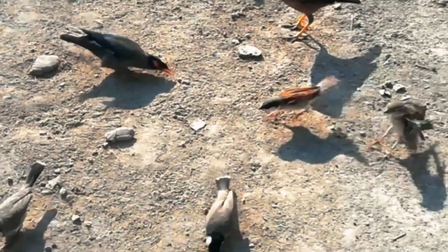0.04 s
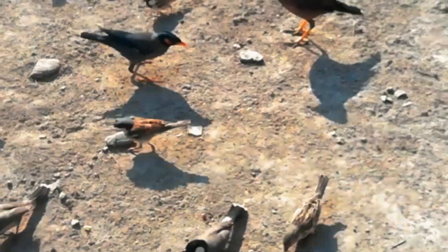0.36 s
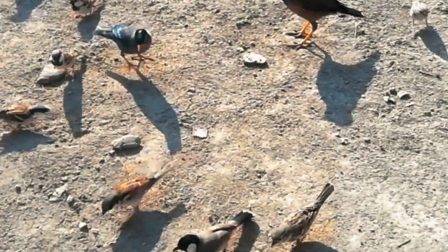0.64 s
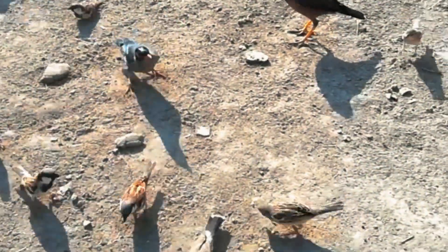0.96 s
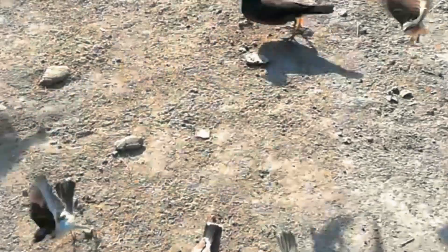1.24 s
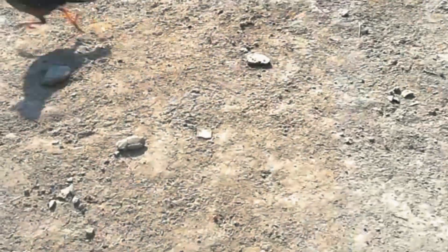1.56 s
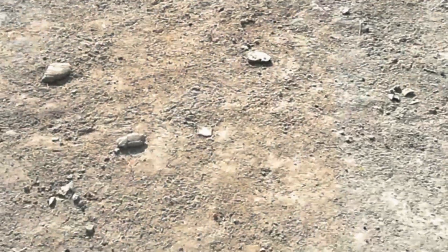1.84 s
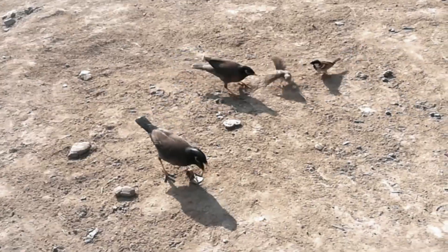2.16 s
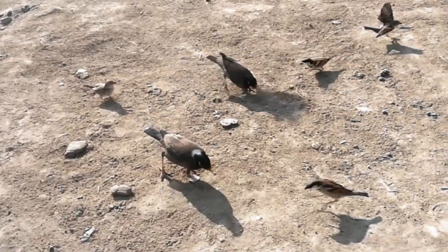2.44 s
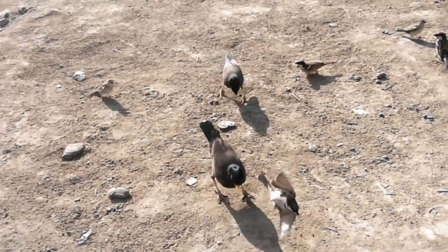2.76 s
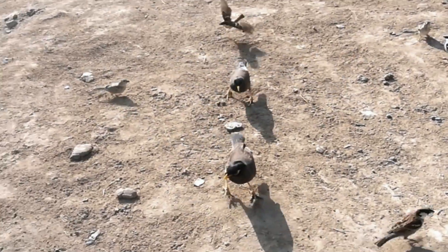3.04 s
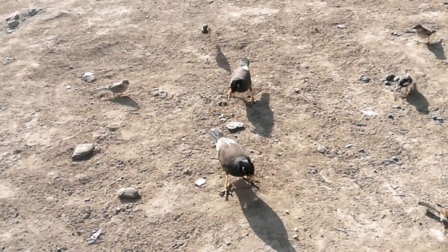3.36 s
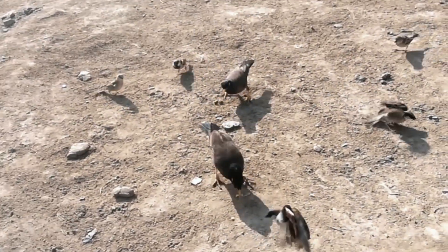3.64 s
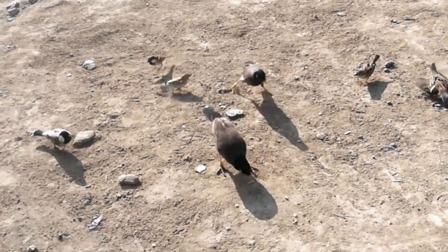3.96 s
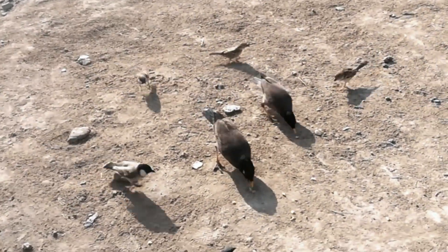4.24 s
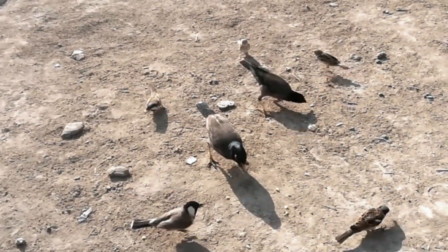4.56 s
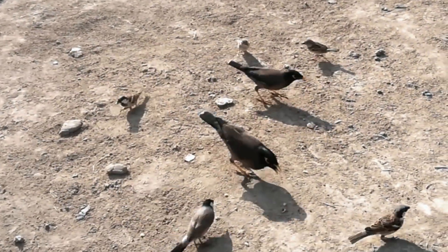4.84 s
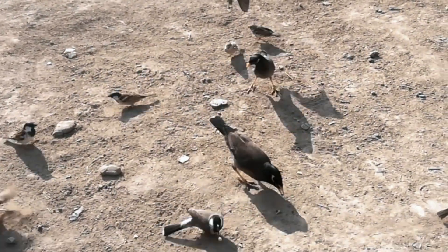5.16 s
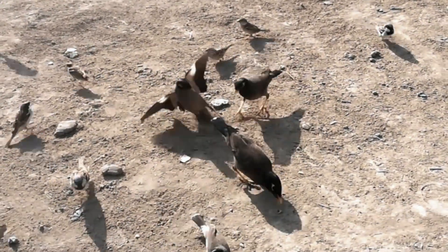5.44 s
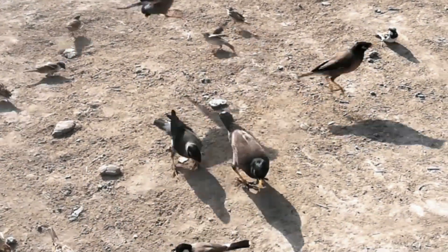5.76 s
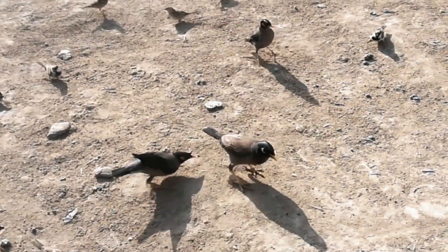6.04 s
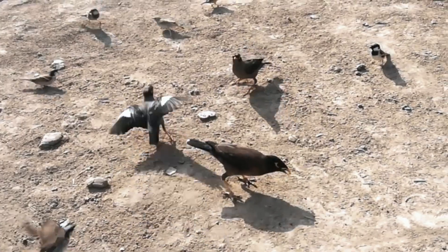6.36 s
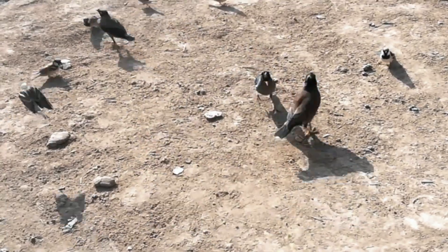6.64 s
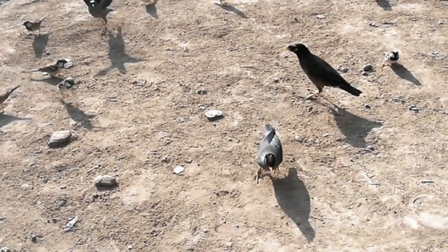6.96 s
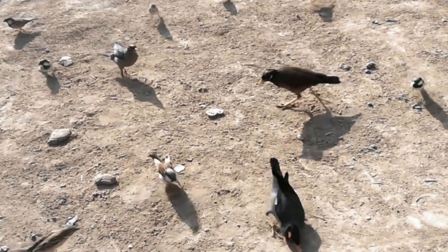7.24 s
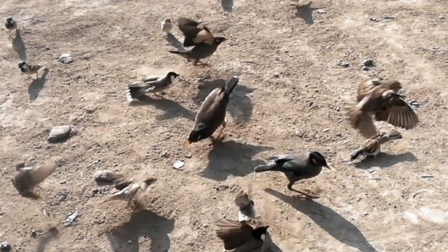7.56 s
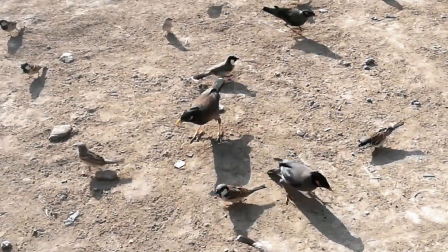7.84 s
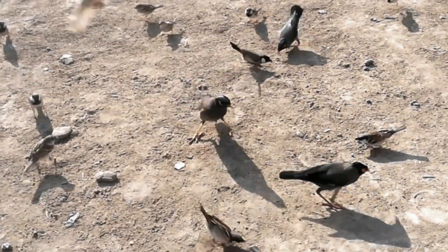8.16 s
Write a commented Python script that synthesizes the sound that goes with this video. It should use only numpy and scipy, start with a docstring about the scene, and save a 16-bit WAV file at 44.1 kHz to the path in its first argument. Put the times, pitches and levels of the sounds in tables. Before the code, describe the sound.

Sharp bird chirps, thin whistles and a repeated two-note call over distant flock chatter, with a flurry of wings near the start.

```python
"""A yard of bare, dry ground where sparrows and mynas feed. Over a bed of rumble and hiss, a far flock
chatters, neighbours cheep, and beaks and feet tap the dirt. Early on the flock takes off in a whoosh
of wing strokes; the sound cuts out for a moment and fades back in. Up front are thin whistles, rasps
and a sharp two-note call. Each voice is a syrinx tone on a gliding pitch, harsh when that pitch shakes."""
import sys
import numpy as np
from scipy import signal
from scipy.fft import rfft, irfft, next_fast_len
from scipy.io import wavfile
from scipy.ndimage import uniform_filter1d, minimum_filter1d, map_coordinates

SR = 44100
rng = np.random.default_rng(int(sys.argv[2]) if len(sys.argv) > 2 else 0)


def to_wav(sig):
    """Store sig (one row per channel, or 1-D mono) as 16-bit WAV at the path in sys.argv[1].

    Samples outside -1..1 are clipped; the rate is SR.
    """
    pcm = np.clip(np.atleast_2d(sig), -1, 1) * 32767
    pcm = np.round(pcm).astype(np.int16)
    wavfile.write(sys.argv[1], SR, pcm.T)  # frames by channels


N = 361179

# Tone colours (frequency [Hz], gain [dB])
RUMBLE_EQ = [(20, -1.5), (40, -2.5), (60, 7), (85, -5), (115, -0.5), (148, 1.5), (200, -5), (300, -9.5),
             (500, -14), (900, -17), (1500, -21.5), (4000, -40)]
HISS_EQ = [(700, -13.5), (2000, 6.5), (3100, 8), (4200, 4.5), (7000, -0.5), (11000, -2), (15500, -2)]
DOWNWASH_EQ = [(25, -3.5), (60, 1), (130, 0.5), (300, -7.5), (750, -14), (2200, -25), (5000, -37)]  # air pushed by wings
FEATHER_EQ = [(150, -36), (400, 7), (1200, 1.5), (3000, 2.5), (7000, -4), (15500, -11)]
DIRT_EQ = [(100, -24), (450, 5), (1400, -3.5), (2600, -2.5), (5000, -15), (16000, -48)]  # a tap on packed earth
SAND_EQ = [(500, -28), (2500, -28), (6000, -3.5), (15000, -17.5)]  # scraped sand
THROAT_EQ = [(1200, -3), (2400, 2), (3600, 3.5), (5500, 1), (7500, -11.5), (11000, -22.5)]  # throat and beak of a small bird
FLAP_EQ = [(400, -26), (1500, -9), (2600, 0), (5000, -1), (8000, -7), (15000, -23)]  # a myna's wing
# Stereo image of the noise layers (frequency [Hz], left-right correlation [0-1])
NOISE_CORRELATION = [(130, 0.917), (290, 0.74), (640, 0.32), (1500, 0.011)]
# Stereo tilt of the calls (frequency [Hz], left over right [dB])
CALL_TILT = [(1200, 0), (2700, 6.5), (3500, 3), (4500, -1.5), (6000, -2), (12000, -12.5)]
# Decay of the yard's echo (frequency [Hz], time to fall 60 dB [s])
YARD_DECAY = [(300, 1), (3000, 0.21), (6000, 0.2), (14000, 0.046)]

# Fader rides (time [s], level [dB])
RUMBLE_RIDE = [(0, -42), (1.9, -47), (2.0, -52), (3.6, -52.5), (7.0, -52.5), (8.15, -51)]
HISS_RIDE = [(0, -50), (1.9, -51), (2.0, -57.5), (8.15, -58)]
CHATTER_RIDE = [(2.7, -54), (2.94, -54), (3.32, -44), (3.64, -42.5), (4.25, -55.5), (4.43, -45.5),
                (4.61, -59), (5.87, -60), (6.25, -52.5), (7.21, -59), (7.36, -50), (8.15, -50.5)]
MASTER_RIDE = [(1.914, -6), (1.92, -45), (1.955, -24.5), (2.02, -8.5), (2.12, 2), (2.2, 3.5)]  # cuts out, then fades back in
# Swell of the take-off (time [s], downwash fader [dB], feather fader [dB])
TAKEOFF_RIDE = [(0.7, -47.5, -50.5), (1.208, -31, -38.5), (1.92, -45.5, -55)]

# Single birds flying a short way (time [s], length [s], level [dB])
FLIT_CUES = [(3.58, 0.17, -55.5), (5.318, 0.28, -59.5), (6.318, 0.323, -58), (7.306, .3, -54.5)]
# A myna's wing strokes (time [s], level [dB])
FLAP_CUES = [(6.392, -47), (6.468, -46), (6.534, -43.5)]
# Beaks and feet on the dirt (time [s], level [dB], sand against tap [dB])
PECK_CUES = [(2.544, -40, -23), (2.744, -41, -23), (3.013, -39, -21), (3.242, -38, -41.5),
             (4.703, -39, -33.5), (4.964, -43, -10), (5.363, -42, -12), (5.58, -42.5, -10),
             (6.294, -44, -22), (6.445, -45, -19)]
# Hoarse falling chirps, from sparrows and, at 0.935 s, a myna (time [s], mid-note pitch [Hz], level [dB])
CHIRP_CUES = [(.935, 2720, -33.5), (3.391, 2690, -46.5), (3.584, 2820, -45.5), (3.629, 2350, -45.5),
              (3.772, 2836, -43), (4.132, 3090, -50), (4.213, 2547, -47), (4.326, 2690, -43),
              (4.55, 2005, -45.5), (5.869, 3020, -56), (6.087, 3350, -43), (6.71, 3030, -47)]
# Cheeps that climb or sink, then level off
# (time [s], length [s], end pitch [Hz], climb [octaves], level [dB], harshness [0-1])
CHEEP_CUES = [(0.116, 0.051, 1886, -0.19, -42, 0.22), (.194, 0.078, 1705, -0.59, -42, 0.5),
              (0.297, .048, 2940, 0.547, -32.5, 0.7), (0.425, 0.036, 3530, .6, -43.5, 1),
              (0.854, 0.1, 2148, -.15, -38.5, 0.6), (1.277, 0.074, 4410, 0.39, -32.5, .96),
              (1.279, .067, 2220, .1, -36, 1), (1.599, 0.086, 3940, 0.37, -38, 1),
              (1.676, 0.0937, 4000, 0, -46, 0.67), (1.82, 0.089, 3860, -0.29, -51.5, 0.57),
              (3.531, 0.046, 3520, -0.0036, -43, 0.77), (3.695, 0.072, 4780, 0.04, -49.5, 0.85),
              (3.872, 0.1, 4380, .3, -48.5, 0.84), (4.383, .04, 4220, 0.48, -47.5, 0.92),
              (4.898, 0.049, 6540, 0.071, -50, .9), (4.981, 0.036, 2710, 0.57, -43, .2),
              (5.031, 0.038, 2750, .15, -53, .2), (5.212, 0.042, 2560, 0.15, -52, 0.1),
              (5.34, 0.032, 2274, 0, -51.5, 0.3), (6.087, 0.018, 7700, 0.44, -55.5, .3),
              (6.186, 0.073, 3426, 0.8, -44.5, .77), (6.585, .044, 2655, 0.15, -46, 0.63),
              (6.846, 0.074, 4100, -0.1, -44, 1), (7.664, 0.0434, 3610, 1.03, -37, 0.5),
              (7.679, 0.0448, 2772, 0.67, -36, 0.44)]
# Long whistles (time [s], length [s], snap depth [Hz], sink time [s], end pitch [Hz], level [dB],
# swell [dB], lowest pitch of the flick [Hz])
WHISTLE_CUES = [(0.801, .185, 2476, 0.1, 4054, -17.5, -2, 6470),
                (2.149, 0.14, 919, 0.0664, 4195, -20.5, 0.5, 5950)]
# Thin notes sliding down (time [s], length [s], end pitch [Hz], level [dB])
SLIDE_CUES = [(.232, 0.026, 5100, -37), (.271, 0.024, 3507, -18.5), (0.36, 0.046, 4550, -42.5),
              (4.923, 0.058, 2546, -40), (7.608, 0.033, 4710, -41)]
# Harsh scolds (time [s], length [s], centre pitch [Hz], level [dB])
SCOLD_CUES = [(0.25, 0.026, 3065, -26), (2.394, 0.019, 3190, -39.5), (4.463, .015, 3320, -38),
              (4.825, 0.038, 2703, -37.5), (7.176, 0.026, 2740, -33.5), (7.245, 0.021, 3054, -31)]
# Two-note calls (time [s], lead end pitch [Hz], main end pitch [Hz], lead level [dB], burr level [dB],
# main level [dB], main sag [dB], overtone trim [dB], left over right [dB], left lag [s])
TWO_NOTE_CUES = [(2.099, 3390, 2630, -33, -35, -26, 1, -15, 2, 0.00021),
                 (2.403, 3680, 2740, -21.5, -32, -16, 3, -28, 4.5, 0.00016),
                 (3.448, 3470, 2460, -17, -28.5, -15.5, 12.5, -24.5, 3.5, 0.000336),
                 (3.906, 3380, 2422, -14, -34.5, -10, 20, -28.5, 2, .00022),
                 (4.475, 3376, 2470, -13, -32.5, -13, 14.5, -26.5, 4, 0.000318),
                 (4.830, 2980, 2534, -36, -38, -32.5, 1.5, -30.5, 2, 0.000357),
                 (6.883, 3310, 2653, -36.5, -38.5, -26, 2, -7, 4, 0.000036)]


def amp(db):
    """Decibels to gain."""
    return 10 ** (np.asarray(db) / 20)


def unit(x):
    """Scale to rms 1."""
    return x / np.sqrt(np.mean(x ** 2) + 1e-20)


def along(points, hz):
    """Read (frequency [Hz], value) points on a log axis."""
    freqs, values = np.transpose(points)
    return np.interp(np.log(hz + 1), np.log(freqs + 1), values)


def clock(length):
    """Sample times over a length in seconds."""
    return np.arange(int(length * SR)) / SR


def curves(rows):
    """One automation curve for each column after the time."""
    times, *columns = np.transpose(rows)
    return [np.interp(np.arange(N) / SR, times, column) for column in columns]


def wobble(t, rate):
    """A smooth random modulator with rate knots a second."""
    return map_coordinates(rng.standard_normal(size=1024), [t * rate], mode="mirror")


def filtered(x, response):
    """Run x through a frequency response."""
    n = x.shape[-1]
    size = next_fast_len(n + 2048)
    return irfft(rfft(x, size) * response(np.fft.rfftfreq(size, 1 / SR)), size)[..., :n]


def coloured(x, eq):
    """x through an EQ curve, at rms 1."""
    return unit(filtered(x, lambda hz: amp(along(eq, hz))))


def rush(eq):
    """Stereo noise, narrow in the bass and wide in the treble."""
    def width(hz):
        angle = np.arccos(np.clip(along(NOISE_CORRELATION, hz), -1, 1)) / 2
        return np.array([np.cos(angle), np.sin(angle)])
    mid, side = filtered(rng.standard_normal((2, N)), width)
    return coloured(np.array([mid + side, mid - side]), eq)


def add(out, start, x):
    """Mix x into out from start, in seconds."""
    part = out[:, max(round(start * SR), 0):][:, :x.shape[-1]]
    part += x[..., :part.shape[1]]


def gate(t, rise, fall):
    """A smooth fade in and out."""
    fade_in = np.sin(np.pi / 2 * np.clip(t / rise, 0, 1))
    fade_out = np.sin(np.pi / 2 * np.clip((t[-1] - t) / fall, 0, 1))
    return (fade_in * fade_out) ** 2


def placed(x, pan_db, lag, bounce):
    """A call arrives left and right directly and by short bounces off the ground and things near by."""
    delays, sides = rng.uniform(0.000587, 0.009, (2, 4, 1)), np.array([[1], [-1]])
    direct = lambda hz: np.exp(-1j * np.pi * hz * lag * sides)
    bounces = lambda hz: bounce * np.exp(-2j * np.pi * hz * delays).mean(axis=1)
    balance = lambda hz: amp(sides * (pan_db + along(CALL_TILT, hz)) / 2)
    return filtered(np.pad(x, (0, 512)), lambda hz: balance(hz) * (direct(hz) + bounces(hz)))


def syrinx(hz, overtone_db, step_db):
    """A bird's voice: a sine on a moving pitch plus four overtones, losing step_db from one to the next."""
    phase = 2 * np.pi * np.cumsum(hz) / SR
    overtones = sum(amp(overtone_db - step_db * (k - 2)) * np.sin(k * phase) * (k * hz < SR / 2)
                    for k in range(2, 6))
    return np.sqrt(2) * (np.sin(phase) + overtones)


def outdoor_bed():
    """Far rumble and soft hiss drift together; one faint distant tone swells and stops."""
    out = np.zeros((2, N))
    drift = amp(0.7 * wobble(np.arange(N) / SR, 8))
    for ride, eq in (RUMBLE_RIDE, RUMBLE_EQ), (HISS_RIDE, HISS_EQ):
        out += amp(curves(ride)[0]) * drift * rush(eq)
    t = clock(0.5)
    tone = syrinx(474 * (1 + 0.005 * wobble(t, 28)), overtone_db=-16, step_db=-1)
    add(out, 6.27, amp(-60) * tone * gate(t, rise=0.41, fall=0.14))
    return out


def yard_echo(send):
    """The ground and far walls scatter a thin echo whose top end dies first."""
    hz, t, noise = signal.stft(rng.standard_normal((2, SR // 2)), SR, nperseg=256)
    decay = amp(-60 * t / along(YARD_DECAY, hz)[:, None])
    tail = signal.istft(noise * decay, SR, nperseg=256)[1]
    predelayed = np.pad(send, ((0, 0), (300, 0)))
    return signal.fftconvolve(predelayed, tail / np.linalg.norm(tail[0]), axes=1)[:, :N]


def falling(length, hz, octaves):
    """A pitch that droops ever faster, passing hz halfway."""
    return hz * 2 ** (-octaves * ((clock(length) / length) ** 2 - 0.5 ** 2))


def climbing(length, hz, octaves):
    """A pitch that climbs quickly and levels off at hz."""
    return hz * 2 ** (-octaves * (1 - clock(length) / length) ** 3.1)


def cheep(pitch_hz, harsh):
    """Pushed harder, a note shakes, its overtones grow and the second side of the syrinx joins in."""
    t = np.arange(len(pitch_hz)) / SR
    shaken = lambda: pitch_hz * (1 + (0.01 + 0.062 * harsh ** 2) * wobble(t, 850))
    first = syrinx(shaken(), overtone_db=-31 + 28.9 * harsh, step_db=5)
    second = syrinx(shaken() * rng.uniform(1.15, 1.4), overtone_db=-8 + 6.9 * harsh, step_db=-4)
    voice = first + 0.51 * harsh * second
    flutter = amp((1.5 + 1.9 * harsh) * wobble(t, 350))
    return coloured(voice * flutter * gate(t, rise=0.01, fall=0.0077), THROAT_EQ)


def far_flock(count=240):
    """Far sparrows chatter nonstop; the busier the flock, the louder and hoarser each bird."""
    out = np.zeros((2, N))
    times, chatter_db = np.transpose(CHATTER_RIDE)
    starts = (np.arange(count) + rng.random(count)) / count * N / SR
    for start, (pitch, slope, size, side, strain) in zip(starts, rng.standard_normal((count, 5))):
        db = np.interp(start, times, chatter_db)
        harsh = np.clip(0.56 + 0.42 * strain + 0.056 * (db - np.median(chatter_db)), 0.55, 1)
        contour = falling(length=0.06, hz=3116 * np.exp(0.13 * pitch), octaves=0.053 + 0.196 * slope)
        note = amp(db - 10.5 + 3.5 * size) * cheep(contour, harsh)
        add(out, start, placed(note, pan_db=2.8 * side + 1, lag=0.00015 * side, bounce=0.79))
    return out


def neighbours():
    """Birds round about fill the middle distance with hoarse chirps and cheeps."""
    out = np.zeros((2, N))
    notes = [(start, db, cheep(falling(length=0.067, hz=hz, octaves=0.32), harsh=0.9))
             for start, hz, db in CHIRP_CUES]
    notes += [(start, db, cheep(climbing(length, hz, climb), harsh))
              for start, length, hz, climb, db, harsh in CHEEP_CUES]
    for start, db, note in notes:
        add(out, start, placed(amp(db) * note, pan_db=-2.5, lag=rng.uniform(0, 0.00021), bounce=0.89))
    return out


def pecks(faint_count=42):
    """Dull taps on packed dirt, each with a scrape of sand; many fainter ones fall at random."""
    out, t = np.zeros((2, N)), clock(0.039)
    faint = [(3.1 + 6 * when, -52 + 8 * force, -10) for when, force in rng.random((faint_count, 2))]
    for start, db, sand_db in PECK_CUES + faint:
        tap = coloured(rng.standard_normal(len(t)), DIRT_EQ) * amp(-60 * t / 0.045)
        sand = coloured(rng.standard_normal((2, len(t))), SAND_EQ) * amp(sand_db - 60 * t / 0.038)
        add(out, start, amp(db - 3.5) * (tap + sand) * gate(t, rise=0.00029, fall=0.009))
    return out


def myna_flaps():
    """A myna hops aside with a few crisp wing strokes."""
    out, t = np.zeros((2, N)), clock(0.016)
    for start, db in FLAP_CUES:
        stroke = coloured(rng.standard_normal((2, len(t))), FLAP_EQ)
        add(out, start, amp(db) * stroke * gate(t, rise=0.0075, fall=0.006))
    return out


def wingbeats(t, rate, birds):
    """The envelope of birds flapping out of step: each stroke is a short swell of its own strength."""
    pace = lambda: rate * np.exp(0.3 * rng.standard_normal() + 0.1906 * wobble(t, 8.3))
    cycles = [np.cumsum(pace()) / SR + rng.random() for _ in range(birds)]
    return unit(sum(np.exp(5 * np.cos(2 * np.pi * cycle) + wobble(t, 21)) for cycle in cycles))


def wings():
    """Each stroke puffs air and swishes feathers: first the whole flock, later single birds."""
    flits, t = np.zeros((2, N)), np.arange(N) / SR
    wash_db, feather_db = curves(TAKEOFF_RIDE)
    airborne = np.interp(t, [0.7, 0.9, 1.92, 1.95], [0, 1, 1, 0])
    strokes = wingbeats(t, rate=16, birds=11)
    feathers, air = rush(FEATHER_EQ), rush(DOWNWASH_EQ)
    wash = amp(wash_db + 4) * unit(2.8 + strokes) * air
    swish = amp(feather_db + 5.5) * unit(1.3 + strokes) * feathers
    for start, length, db in FLIT_CUES:
        t = clock(length)
        flutter = unit(1.5 + wingbeats(t, rate=17, birds=2)) * gate(t, rise=0.04, fall=0.06)
        add(flits, start, amp(db) * flutter * (feathers + air)[:, :len(t)])
    return flits + airborne * (wash + swish)


def whistles(hold_hz=5663, snap_decay_s=0.0083, snap_period_s=0.03, flick_s=0.034, flick_ahead_s=0.044):
    """After a swooping flick, a nearly pure whistle snaps down, overshoots, holds and sinks."""
    out = np.zeros((2, N))
    for start, length, snap_hz, sink_s, end_hz, db, swell_db, flick_hz in WHISTLE_CUES:
        t = clock(flick_s)
        swoop_hz = flick_hz + 0.6 * snap_hz * (2 * t / flick_s - 1) ** 2
        flick = syrinx(swoop_hz, overtone_db=-34, step_db=3)
        flick *= amp(db - 23.5 + 18 * t / flick_s) * gate(t, rise=0.003, fall=0.0059)
        add(out, start - flick_ahead_s, placed(flick, pan_db=-2.5, lag=0.000098, bounce=0.2))
        t = clock(length)
        snap = snap_hz * np.exp(-t / snap_decay_s) * np.cos(2 * np.pi * t / snap_period_s)
        hz = end_hz + (hold_hz - end_hz) * np.exp(-(t / sink_s) ** 2) + snap
        note = syrinx(hz * (1 + 0.004 * wobble(t, 700)), overtone_db=-39, step_db=-3.5)
        note *= amp(db + 2.5 * wobble(t, 120) + swell_db * t / length) * gate(t, rise=0.005, fall=0.0324)
        add(out, start, placed(note, pan_db=1.5, lag=0.00011, bounce=1))
    return out


def slur(length, start_hz, end_hz, glide_s, sag_db, overtone_db):
    """A note dives steeply, cracks at the bend, and loses sag_db as the pitch settles."""
    t = clock(length)
    crack = np.exp(-((t - 1.52 * glide_s) / (0.14 * glide_s)) ** 2)
    hz = end_hz + (start_hz - end_hz) * np.exp(-(t / glide_s) ** 1.24)
    hz *= 1 + (0.011 + 0.034 * crack) * wobble(t, 1285)
    sag = sag_db * (1 - np.exp(-(np.maximum(t - 0.007, 0) / 0.0051) ** 2))
    # the overtones come forward as the fundamental sags
    tone = syrinx(hz, overtone_db - 11 + 1.768 * sag, step_db=14.5)
    # a faint sub-octave voice, lifted in the crack
    sub_db = -41.5 + 18 * crack + 0.5 * sag + 1.2 * wobble(t, 385)
    tone += amp(sub_db) * syrinx(hz / 2, overtone_db=-9, step_db=6)
    flutter_db = (2.5 + 4.3 * crack) * wobble(t, 413)
    return tone * amp(flutter_db - sag) * gate(t, rise=0.01, fall=0.0067)


def rasp(length, centre_hz, whirl_hz):
    """A fast, uneven whirl of pitch turns the note harsh; it is loudest near the top of each whirl."""
    t = clock(length)
    whirl = np.cos(2 * np.pi * np.cumsum(whirl_hz * (1 + 0.27 * wobble(t, 173))) / SR)
    hz = centre_hz * np.exp(0.299 * whirl + 0.13 * wobble(t, 1208))
    envelope = amp(3.26 * whirl + 4.8 * wobble(t, 491)) * gate(t, rise=0.0035, fall=0.0076)
    return unit(syrinx(hz, overtone_db=-29, step_db=17) * envelope)


def short_calls():
    """Thin sliding notes and harsh scolds from the birds in front."""
    out = np.zeros((2, N))
    for start, length, end_hz, db in SLIDE_CUES:
        note = slur(length, 1.33 * end_hz, end_hz, glide_s=0.3 * length, sag_db=-0.5, overtone_db=-4.5)
        add(out, start, placed(amp(db) * note, pan_db=2, lag=0.00006, bounce=0.61))
    for start, length, centre_hz, db in SCOLD_CUES:
        note = rasp(length, centre_hz, whirl_hz=195)
        add(out, start, placed(amp(db) * note, pan_db=0, lag=0.000089, bounce=1))
    return out


def two_note_calls(launch_hz=5330, burr_after_s=0.025, main_after_s=0.046):
    """A close bird repeats a short lead note, a burr and a longer main note, varying force and pitch."""
    out = np.zeros((2, N))
    for start, lead_hz, main_hz, lead_db, burr_db, main_db, sag_db, trim_db, pan_db, lag in TWO_NOTE_CUES:
        lead = amp(lead_db) * slur(0.023, launch_hz, lead_hz, glide_s=0.0038,
                                   sag_db=3, overtone_db=trim_db + 6)
        burr = amp(burr_db) * rasp(0.017, centre_hz=2497, whirl_hz=110)
        main = amp(main_db) * slur(0.045, launch_hz, main_hz, glide_s=0.0095,
                                   sag_db=sag_db, overtone_db=trim_db)
        for after, note in (0, lead), (burr_after_s, burr), (main_after_s, main):
            add(out, start + after, placed(note, pan_db, lag, bounce=0.67))
    return out


def limiter(x, ceiling, size=220):
    """The gain ducks for a few milliseconds around peaks above the ceiling."""
    needed = ceiling / np.maximum(np.abs(x).max(axis=0), ceiling)
    return x * uniform_filter1d(minimum_filter1d(needed, 2 * size), size)


def scene():
    """The mix: the further birds get more echo send than the close ones."""
    near = two_note_calls() + short_calls() + whistles() + pecks() + myna_flaps()
    around = neighbours() + far_flock()
    echo = yard_echo(amp(-18.5) * near + amp(-13) * around)
    return near + around + echo + wings() + outdoor_bed()


def record(dry, top_hz=15900):
    """The sound cuts out once and fades back in; peaks are held down and the very top is cut off."""
    limited = limiter(dry * amp(curves(MASTER_RIDE)[0]), ceiling=0.96)
    return filtered(limited, lambda hz: hz < top_hz)


dry = scene()
out = record(dry)
to_wav(out)
```